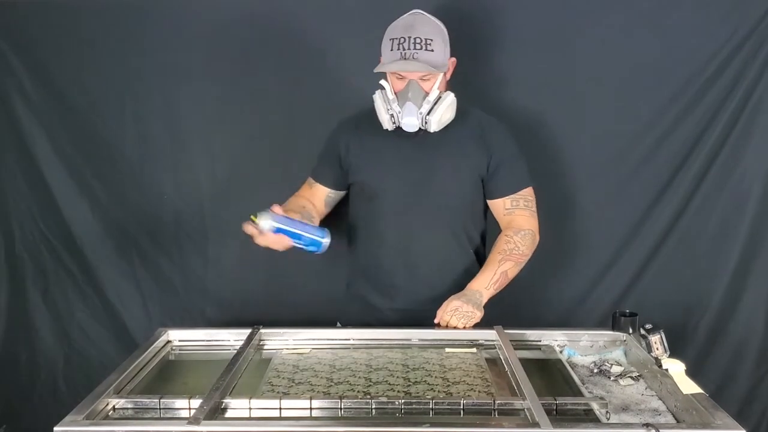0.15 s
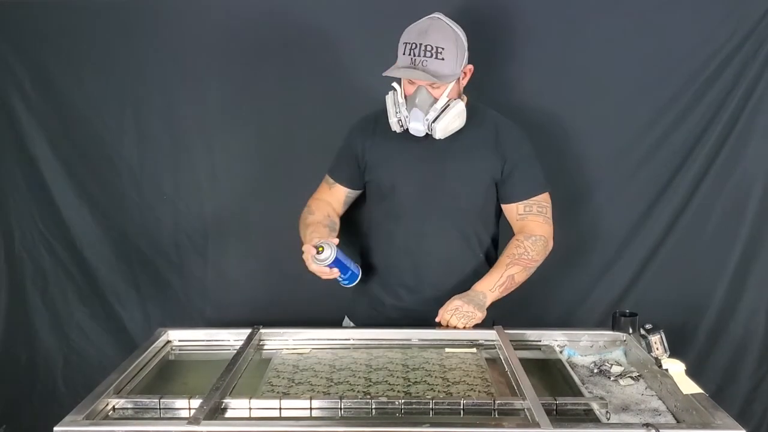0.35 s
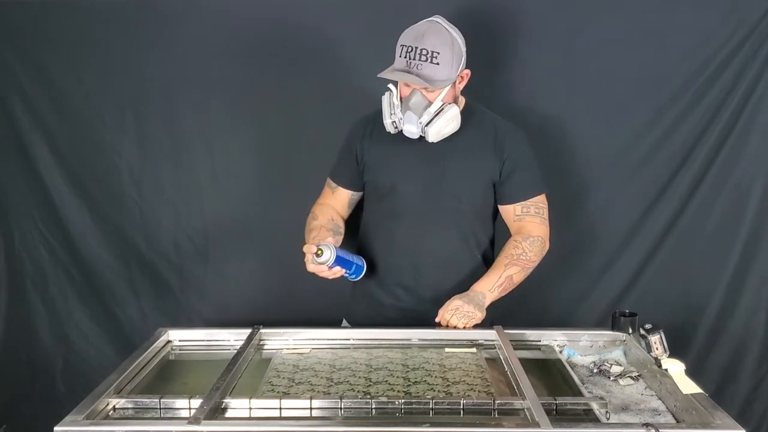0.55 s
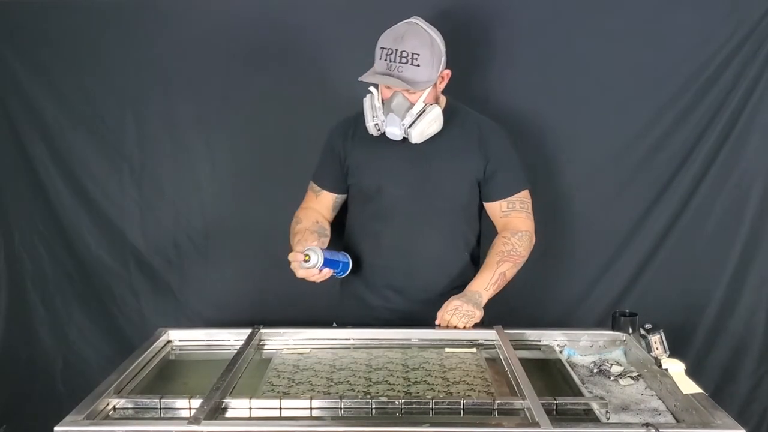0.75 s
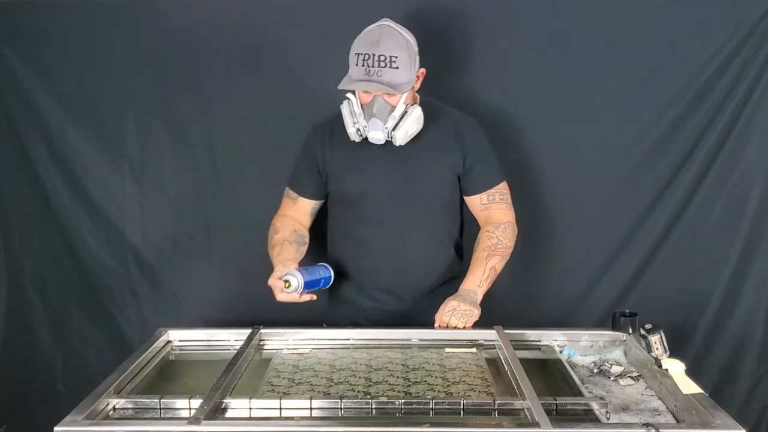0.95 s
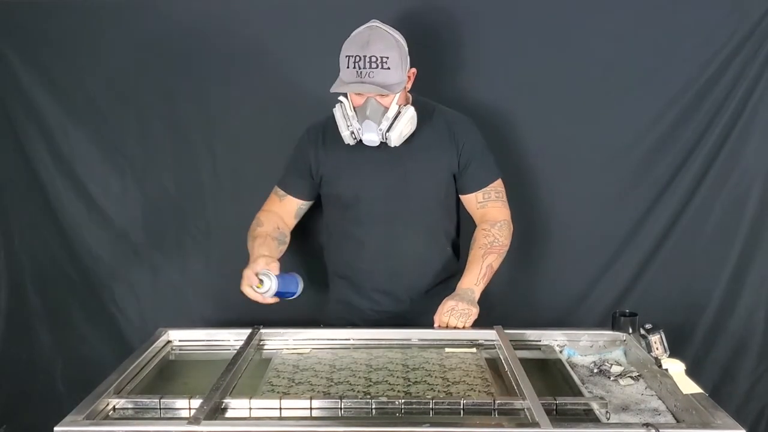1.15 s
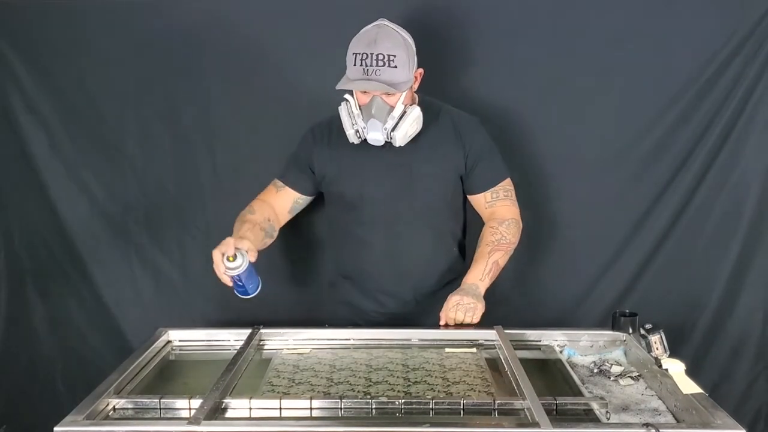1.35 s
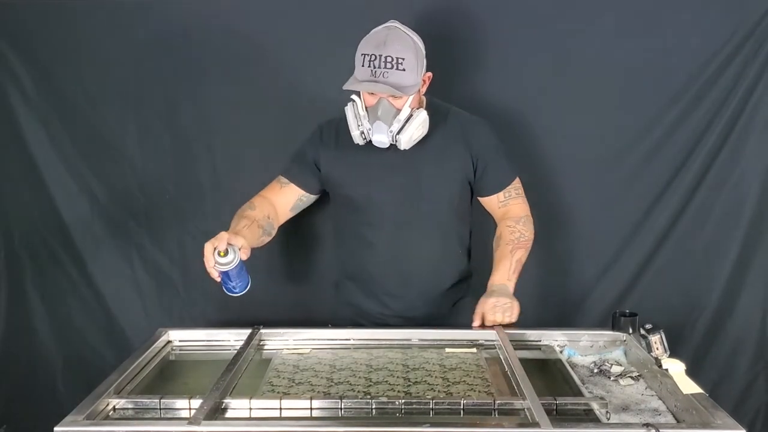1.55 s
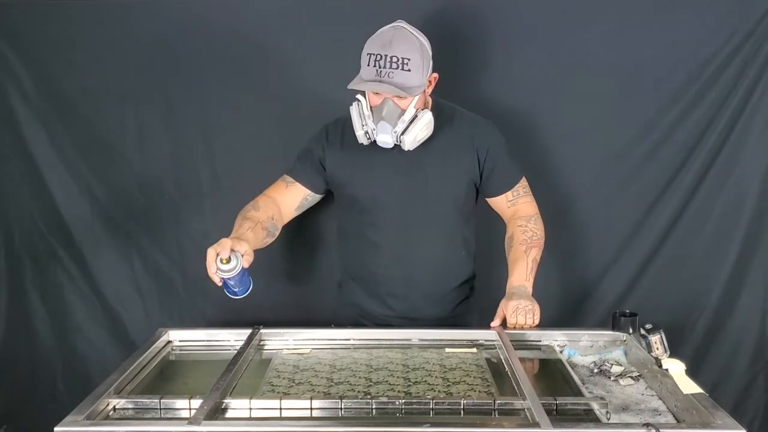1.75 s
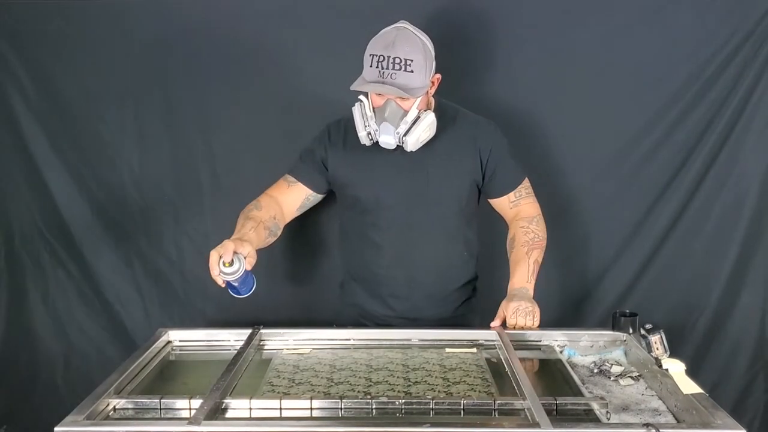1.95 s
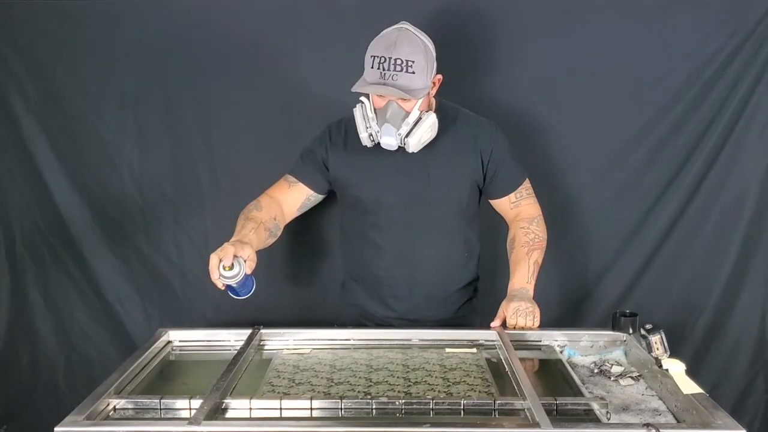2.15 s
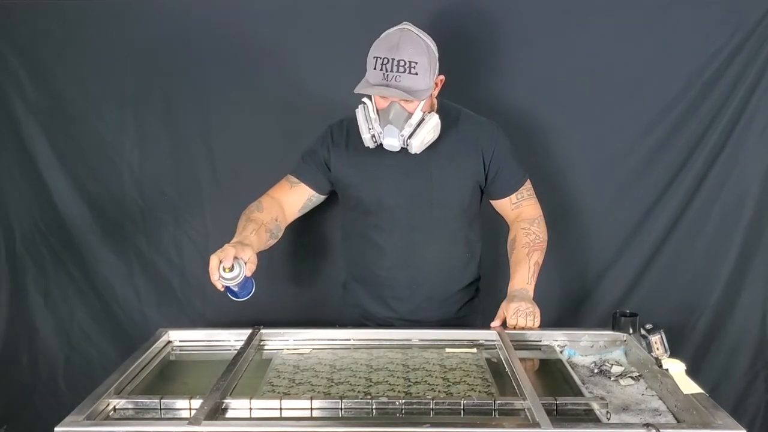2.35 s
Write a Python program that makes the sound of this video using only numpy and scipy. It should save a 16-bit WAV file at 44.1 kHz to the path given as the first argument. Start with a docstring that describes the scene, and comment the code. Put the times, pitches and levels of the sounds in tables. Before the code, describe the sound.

A shaken spray can, slightly left of centre in a live workshop, rattles with dense metallic clicks from 0 to 0.15 s, over the ringing of earlier shakes. Weaker clicks follow until 0.4 s, then a dull, tight double knock at 0.48. Faint ticks and ball rolling run from 0.7 to 1.2, soft swishes until 1.7. Low ventilation rumble continues throughout; a bright spray hiss opens around 2.38 and swells.

```python
"""Live workshop, two microphones, a spray can a little left of centre: ventilation (shaped noise and narrow bands)
rumbles throughout, under a dying wash of noise from earlier shakes. The mixing ball rattles, then clicks (short
contacts and ringing modes) as the can is turned; a dull double knock (soft pulses, short ring) falls among the clicks.
The ball rolls on the wall (dense random grains), the tipped can swishes softly (noise with a drawn level), and last
the nozzle starts to hiss (bright, swelling noise). The ball and knock sounds pass through echoes and a diffuse tail."""
import sys
import numpy as np
from scipy import signal
from scipy.fft import rfft, irfft
from scipy.io import wavfile

SR = 44100
rng = np.random.default_rng(int(sys.argv[2]) if len(sys.argv) > 2 else 0)


def store_wav(level_fs):
    """Save 16-bit WAV to argv[1]."""
    pcm = np.round(np.clip(np.atleast_2d(level_fs), -1, 1) * 32767)
    wavfile.write(sys.argv[1], SR, pcm.T.astype(np.int16))


N = 109456

# Likeness is the correlation of the two microphones, from -1 to 1.
# Ventilation, colour: f/Hz, relative level/dB
VENT_COLOUR = [(20, -22), (33, -20), (45, -9), (55, 0.03), (66, 0.92), (80, -7), (100, -14), (120, -13),
               (150, -17), (200, -21), (260, -22), (340, -33), (500, -40), (800, -45), (1300, -52),
               (1850, -52), (2400, -57), (5000, -62), (11000, -65), (13000, -72), (16000, -76)]
# Ventilation at the two microphones: f/Hz, likeness/1
VENT_LIKENESS = [(30, 0.95), (100, 0.98), (250, .85), (600, 1), (2000, 0.14), (16000, .1)]
# Faint whine of the fan: f/Hz, level/dB
FAN_WHINE = [(1776, -92), (1911, -90.5)]
VENT_DB, WHINE_WIDTH_HZ = -52.5, 55

# Sound of the struck can, also the colour of the wash: f/Hz, relative level/dB
SHELL_COLOUR = [(60, -27.5), (250, -20.5), (500, -8.5), (800, -8.5), (1100, -3.5), (1400, -2.5),
                (1900, 3.5), (2300, -0.5), (2800, 2), (3300, -4), (4000, -0.5), (5300, -10), (6700, -7.5),
                (8200, -14.5), (10000, -12), (13000, -14.5), (16000, -13.5)]
# Diffuse sound of the workshop at the two microphones: f/Hz, likeness/1
ROOM_LIKENESS = [(60, 1), (200, 1), (500, 0.7), (1200, 0.013), (4000, 0.14), (16000, 0)]
WASH_DB, WASH_T60_S = -43.5, 0.7  # level at the start, time to fall 60 dB

# Decay of the workshop: f/Hz, t60/s
ROOM_DECAY = [(100, 1), (500, 0.35), (1000, 0.51), (2000, 0.76), (4000, 0.64), (8000, 0.52), (16000, 0.4)]
# Early echoes, counted from the direct sound: t/s, gain/1
EARLY_ECHOES = [(.0009, 0.29), (.0027, 0.37), (.0052, 0.34), (.0074, 0.3)]
TAIL_DB, TAIL_BUILD_S = 4.5, 0.0025
# each is added on the left and taken off on the right
TAIL_LEAN_DB, DIRECT_LEAN_DB = 0.26, 1.9
LEFT_LEAD_S = 0.00007  # the direct sound reaches the left microphone first

# Ball strikes: t/s, relative level/dB, colour/dB at 900, 4000, 8000 and 14000 Hz,
# relative wall ring/dB, relative dome ring/dB
BALL_STRIKES = [(0.0101, 0, -0.5, 0, 6.5, -1, -2.5, -10.5), (0.02, -3.5, 0, -0.5, 3.5, 4.5, -3, -9.5),
                (0.0256, -6.5, 5.5, 2, 0.5, 2, -4.5, -11), (0.0382, -2, -5, -1, 5, 5.5, -1.5, -9.5),
                (.0445, -2, -15, -6, -10, -9, 7, -12), (0.0793, -1, -3, -1, -1.5, -9, -2, -12),
                (0.089, -9, 4, -5.5, -7.5, -13.5, 6, -15), (0.1348, -2, -12, -13.5, -19.5, -17, 1.5, -18),
                (0.1407, -5, -7.5, -14, -19, -32, -5.5, -15), (0.1521, -10, -16, -20, -26, -26, -8, -13),
                (0.212, -19, 4, -5, 8, 10, -6, -10), (0.225, -25, -17, -8, 9, 12, -14, -10),
                (.283, -8, -0.5, -3.5, 2, 3.5, -6, -11), (0.2882, -8.5, -1.5, -2, -1.5, -11, -5.5, -14),
                (0.357, -30, 13, 5.5, 1.5, 7, -7, -10), (0.3879, -11.5, 2, 9.5, 7, 10, -13, 7),
                (0.3888, -9.5, 7.5, 5, 7.5, 9, -13, 9), (.695, -20, 3, 4, 2.5, 2.5, 0, -6),
                (0.7, -22.5, 0, 3.5, 2.5, 9.5, -7, -6), (.977, -28, -2, 4, 4.5, 5.5, -9, -6)]
# Ringing of the can's wall: f/Hz, relative level/dB, t60/s
WALL_MODES = [(1325, -4, .2), (1390, 1.5, .2), (1637, -2, 0.18), (1743, -0.5, .25), (1800, -3.5, 0.74),
              (1835, -6.5, .3), (1986, -4, 0.16), (2105, -6, 0.21), (2530, -7, .2), (2590, -5, .2),
              (2874, -7.5, 0.09), (2924, -6.5, .2)]
# Ringing of the can's domed end: f/Hz, relative level/dB, t60/s
DOME_MODES = [(2790, -8.5, .06), (3900, -2, .1), (3950, 0, .11), (4080, -3, 0.1), (6640, -7, .07),
              (6790, -8.5, .07)]
STRIKE_DB, RING_DB = 4, -51.5  # added to every strike; ring level before that
CHATTER_GAIN, CHATTER_S = 0.28, 0.0011
CHATTER_COLOUR = 0.6  # exponent on the contact spectrum: below 1 evens it out

# Dull knock, colour: f/Hz, relative level/dB
KNOCK_COLOUR = [(50, -4.5), (150, -1), (300, -6.5), (480, 0), (720, -3), (950, -15), (2000, -1.5),
                (4000, -32), (8000, -58), (16000, -39)]
# Dull knock, ringing: f/Hz, relative level/dB, t60/s
KNOCK_MODES = [(466, 2, 0.11), (522, 6.5, 0.14), (690, -0.5, .05), (2020, -3, 0.28), (2120, -3.5, 0.32),
               (2194, -4, .25), (2720, -23, 0.11), (4000, 1, 0.14)]
KNOCK_S, KNOCK_DB, KNOCK_RING_DB = 0.479, -1.5, -50  # thud and ring of the first blow
KNOCK_BOUNCE_S, KNOCK_BOUNCE_DB = 0.0045, 0.5  # second blow, relative to the first

# Ball rolling along the wall: t/s, level/dB before halving and the room
ROLL_LEVEL = [(.70, -70), (.745, -50), (.79, -53), (0.849, -55.5), (0.919, -77), (.98, -64), (1.03, -55.5),
              (1.08, -59.5), (1.14, -71.5), (1.2, -95.5)]
# Rolling, colour: f/Hz, relative level/dB
ROLL_COLOUR = [(200, -15.5), (700, -2.5), (1000, -4), (1250, 0.5), (1750, 4), (2200, -6.5), (2800, 1),
               (4000, -7.5), (5500, -4.5), (8500, -12), (12000, -8), (16000, -9.5)]
ROLL_GRAINS_PER_S, ROLL_SPREAD_DB = 1500, 3  # spread is the standard deviation of grain size

# Swish of the tipped can: t/s, level/dB
SWISH_LEVEL = [(1.0, -73), (1.15, -61), (1.27, -65), (1.33, -61.5), (1.421, -71), (1.47, -75.5),
               (1.52, -66.5), (1.62, -64), (1.69, -71), (1.77, -80), (1.9, -82), (2.15, -100)]
# Swish, colour: f/Hz, relative level/dB
SWISH_COLOUR = [(100, -6), (200, 9.5), (400, 6), (600, -5), (900, -5.5), (1200, -9), (1480, 0.5),
                (1650, -5.5), (1900, 1), (2200, -7.5), (2730, 4), (3200, -4), (4100, 4), (5500, -2.5),
                (8300, -11.5), (9700, -3), (11000, -11), (14400, -4), (16000, -5.5)]

# Spray, colour: f/Hz, relative level/dB
SPRAY_COLOUR = [(200, -45), (400, -26), (650, -24.5), (1000, -16.5), (1450, -21), (1750, -16.5),
                (2200, -17), (2700, -10), (3100, -15), (4200, -11.5), (5200, -13.5), (8000, -6),
                (10600, -10), (14200, -.5), (15800, -1)]
# Spray, left minus right: f/Hz, level difference/dB
SPRAY_SIDE = [(240, -2), (950, 1), (3800, 1), (9000, 3.5), (15000, 7)]
# Spray at the two microphones: f/Hz, likeness/1
SPRAY_LIKENESS = [(500, 0.62), (3000, -0.054), (8000, 0.061), (15000, -0.15)]
SPRAY_S, SPRAY_OPEN_S = 2.378, 0.019
SPRAY_DB, SPRAY_SWELL_DB_PER_S = -36, 48  # level at the onset, before the swell

EDGE_HZ = 15900


def amp(db):
    """Decibels to gain."""
    return 10 ** (np.asarray(db) / 20)


def unit(x):
    """Scales to rms 1."""
    return x / np.sqrt(np.mean(x ** 2) + 1e-20)


def read(points, hz):
    """Reads a table on a log-frequency axis."""
    f, value = np.transpose(points)
    return np.interp(np.log(hz + 1), np.log(f + 1), value)


def pair(spectra, likeness, hz):
    """Makes two independent spectra partly alike, as two microphones hear one sound field."""
    c = np.clip(read(likeness, hz), -1, 1)
    return np.array([spectra[0], c * spectra[0] + np.sqrt(1 - c ** 2) * spectra[1]])


def noise(colour, likeness, side=((1, 0), (2, 0))):
    """Stereo noise of rms 1 with a colour, a likeness and a left-right balance."""
    hz = np.fft.rfftfreq(N, 1 / SR)
    spectra = pair(rfft(rng.standard_normal((2, N))), likeness, hz)
    level_db = read(colour, hz) + np.outer([0.5, -0.5], read(side, hz))
    return unit(irfft(spectra * amp(level_db), N))


def wavering(hz, width_hz):
    """A tone blurred into a narrow band of noise, separate at each microphone."""
    low_pass = signal.butter(2, width_hz / 2, fs=SR, output="sos")
    blur = signal.sosfilt(low_pass, rng.standard_normal((2, N)))
    return unit(blur * np.sin(2 * np.pi * hz * np.arange(1, N + 1) / SR))


def ventilation():
    """Low rumble of moving air as shaped noise, with the faint whine of the fan."""
    rumble = amp(VENT_DB) * noise(VENT_COLOUR, VENT_LIKENESS)
    whine = sum(amp(db) * wavering(hz, WHINE_WIDTH_HZ) for hz, db in FAN_WHINE)
    return rumble + whine


def wash():
    """The workshop still rings from earlier shakes: noise dying away exponentially."""
    t = np.arange(N) / SR
    return noise(SHELL_COLOUR, ROOM_LIKENESS) * amp(WASH_DB - 60 * t / WASH_T60_S)


def pulse(colour, shading=((1, 0), (2, 0)), size=2048):
    """A causal, minimum-phase click with the given spectrum."""
    hz = abs(np.fft.fftfreq(size, 1 / SR))
    log_gain = np.log(amp(read(colour, hz) + read(shading, hz)))
    # the Hilbert transform of the log gain supplies the phase
    return np.fft.ifft(np.exp(np.conj(signal.hilbert(log_gain)))).real


def ring(modes, size=16384):
    """Decaying modes, each excited a little differently by every blow."""
    t = np.arange(size) / SR
    hz, db, t60 = np.transpose(modes)[:, :, None]
    excitation = rng.uniform(0.5, 1, hz.shape) * rng.choice([-1, 1], hz.shape)
    decay = amp(db - 60 * t / t60)
    return (excitation * decay * np.sin(2 * np.pi * hz * t)).sum(0)


def strike(db, bass_db, mid_db, treble_db, top_db, wall_db, dome_db, size=512):
    """The ball hits, chatters for an instant and leaves the can's wall and dome ringing."""
    t = np.arange(size) / SR
    contact = CHATTER_GAIN * rng.standard_normal(size) * np.exp(-t / CHATTER_S)
    contact[0] = 1
    spectrum = rfft(contact, 2 * size)
    contact = irfft(spectrum * abs(spectrum) ** (CHATTER_COLOUR - 1))[:size]
    contact /= np.linalg.norm(contact)
    shading = [(350, 0), (900, bass_db), (1800, 0), (4000, mid_db), (8000, treble_db), (14000, top_db)]
    click = np.convolve(contact, pulse(SHELL_COLOUR, shading))
    body = amp(RING_DB + wall_db) * ring(WALL_MODES) + amp(RING_DB + dome_db) * ring(DOME_MODES)
    body[:len(click)] += click
    return amp(STRIKE_DB + db) * body


def in_room(sound, size=49152):
    """Direct sound from left of centre, early echoes and a diffuse tail drawn afresh at each call."""
    t = np.arange(size) / SR
    # the tail is noise that decays at its own rate in each band
    hz, when, bands = signal.stft(rng.standard_normal((2, size)), SR, nperseg=256)
    fall = amp(-60 * when / read(ROOM_DECAY, hz)[:, None])
    tail = signal.istft(bands * fall, SR)[1][:, :size]
    tail = tail * (1 - np.exp(-t / TAIL_BUILD_S))
    tail /= np.linalg.norm(tail[0])
    hz, sides = np.fft.rfftfreq(size, 1 / SR), np.array([[1], [-1]])
    path = pair(rfft(tail), ROOM_LIKENESS, hz) * amp(TAIL_DB + TAIL_LEAN_DB * sides)
    arrival = np.array([[0], [LEFT_LEAD_S]])
    path += amp(DIRECT_LEAN_DB * sides) * np.exp(-2j * np.pi * hz * arrival)
    for delay, gain in EARLY_ECHOES:
        echo_s = delay * rng.uniform(0.9, 1.1, (2, 1))  # a separate delay for each microphone
        path += gain * np.exp(-2j * np.pi * hz * echo_s)
    fade = np.minimum(1, (t[-1] - t) * 10)  # over the last 0.1 s
    return signal.fftconvolve(sound[None], irfft(path) * fade, axes=1)


def knock():
    """A soft, heavy blow with a short metallic ring."""
    body = amp(KNOCK_RING_DB) * ring(KNOCK_MODES)
    thud = amp(KNOCK_DB) * pulse(KNOCK_COLOUR)
    body[:len(thud)] += thud
    return body


def roll():
    """Tiny dense contacts of random size as the ball slides round the wall."""
    t, (s, db) = np.arange(N) / SR, np.transpose(ROLL_LEVEL)
    hits = rng.random(N) < ROLL_GRAINS_PER_S / SR
    grains = hits * rng.choice([-1, 1], N) * amp(ROLL_SPREAD_DB * rng.standard_normal(N))
    scrape = unit(signal.fftconvolve(grains, pulse(ROLL_COLOUR))[:N])
    rolling = (t > s[0]) * (t < s[-1])
    return in_room(0.5 * scrape * amp(np.interp(t, s, db)) * rolling)[:, :N]


def swish():
    """A soft, hollow swish, probably the liquid shifting in the can: noise with a moving level."""
    s, db = np.transpose(SWISH_LEVEL)
    level_db = np.interp(np.arange(N) / SR, s, db)
    return noise(SWISH_COLOUR, ROOM_LIKENESS) * amp(level_db)


def spray():
    """The valve opens and the jet hisses as bright noise, swelling as the room fills."""
    t = np.maximum(np.arange(N) / SR - SPRAY_S, 0)
    opening = np.minimum(t / SPRAY_OPEN_S, 1)
    swell = amp(SPRAY_DB + SPRAY_SWELL_DB_PER_S * t)
    return noise(SPRAY_COLOUR, SPRAY_LIKENESS, SPRAY_SIDE) * opening * swell


def add(mix, s, sound):
    """Mixes a stereo sound in at time s, in seconds."""
    part = mix[:, round(s * SR):][:, :sound.shape[1]]
    part += sound[:, :part.shape[1]]


def scene():
    """The can in the workshop, over the ventilation."""
    mix = ventilation() + wash()
    for s, *blow in BALL_STRIKES:
        add(mix, s, in_room(strike(*blow)))
    add(mix, KNOCK_S, in_room(knock()))
    add(mix, KNOCK_S + KNOCK_BOUNCE_S, amp(KNOCK_BOUNCE_DB) * in_room(knock()))
    return mix + roll() + swish() + spray()


def record(dry):
    """The recorder's band limit: a steep low-pass on both microphones."""
    low_pass = signal.firwin(401, EDGE_HZ, window=("kaiser", 8), fs=SR)
    return signal.oaconvolve(dry, low_pass[None], "same")


dry = scene()
out = record(dry)
store_wav(out)
```